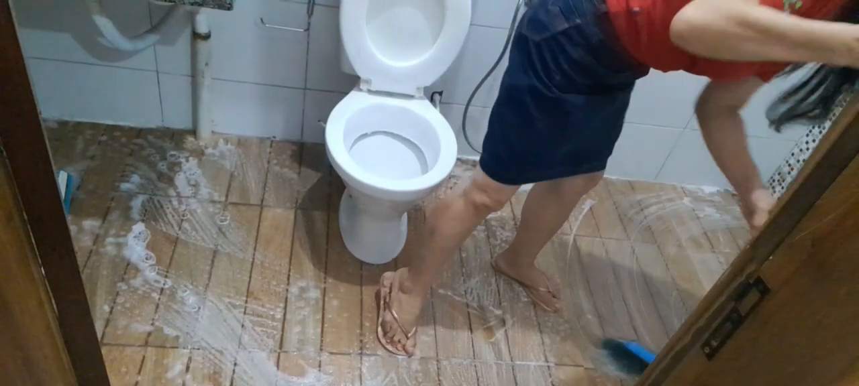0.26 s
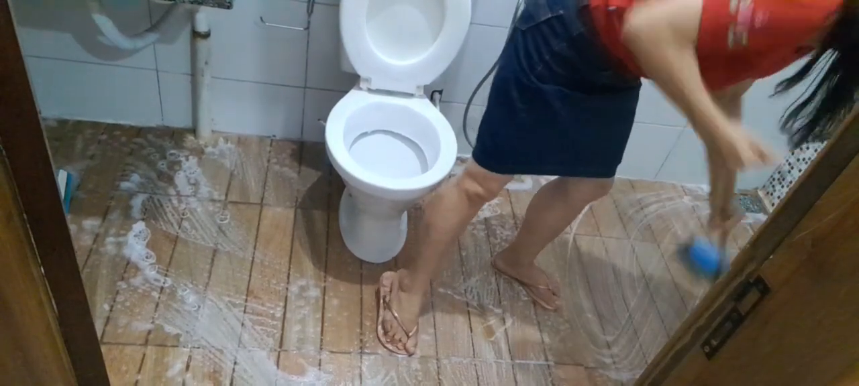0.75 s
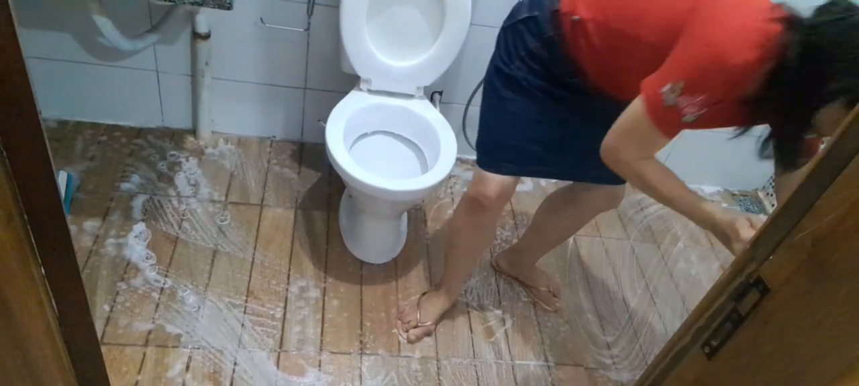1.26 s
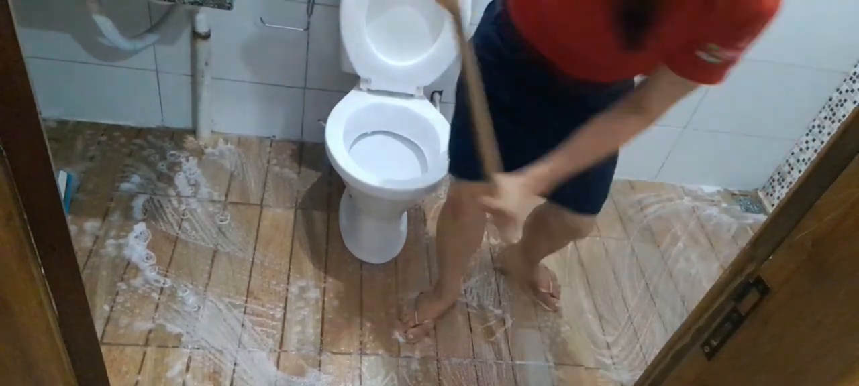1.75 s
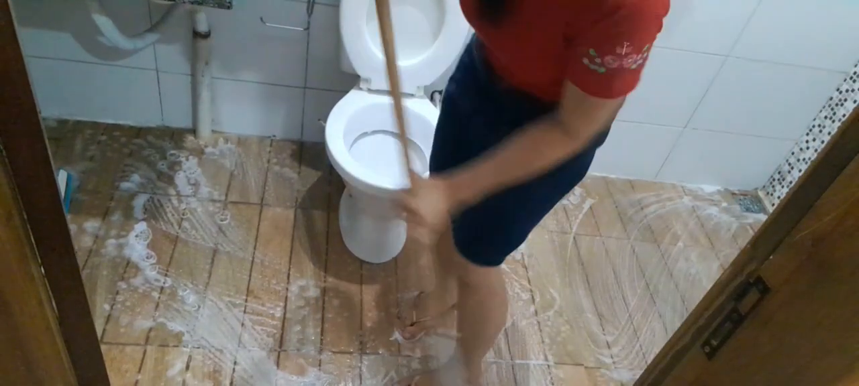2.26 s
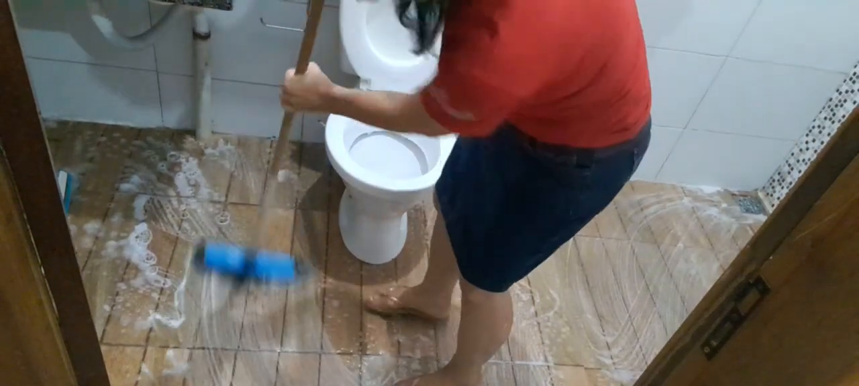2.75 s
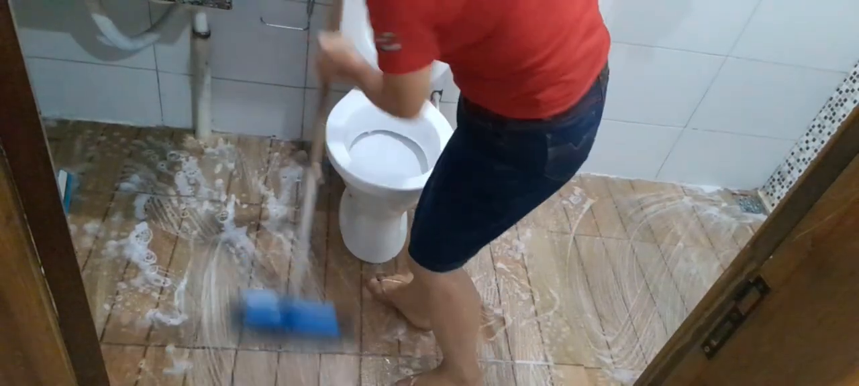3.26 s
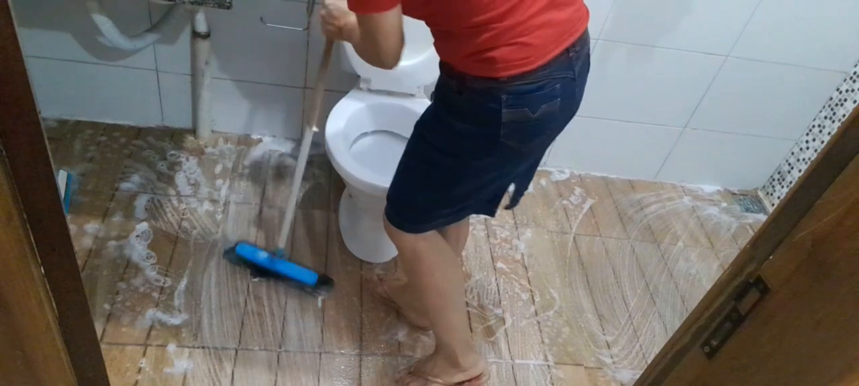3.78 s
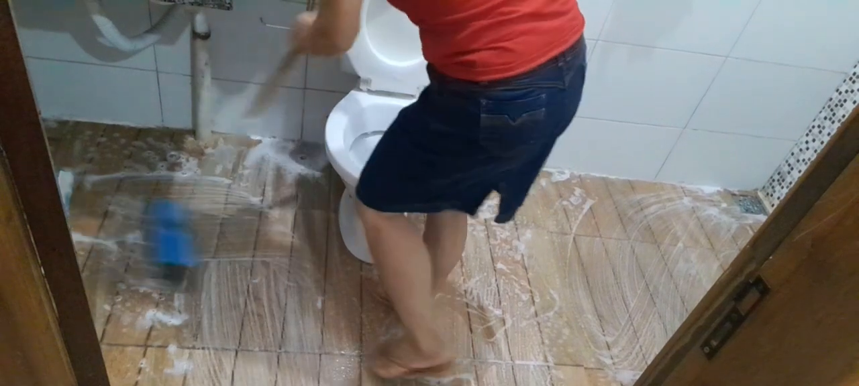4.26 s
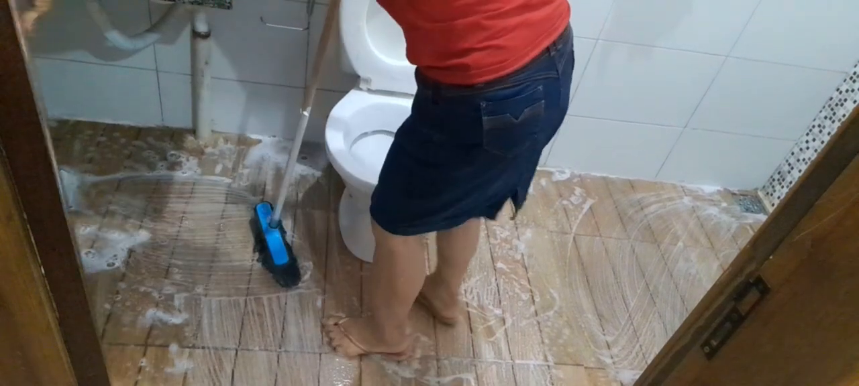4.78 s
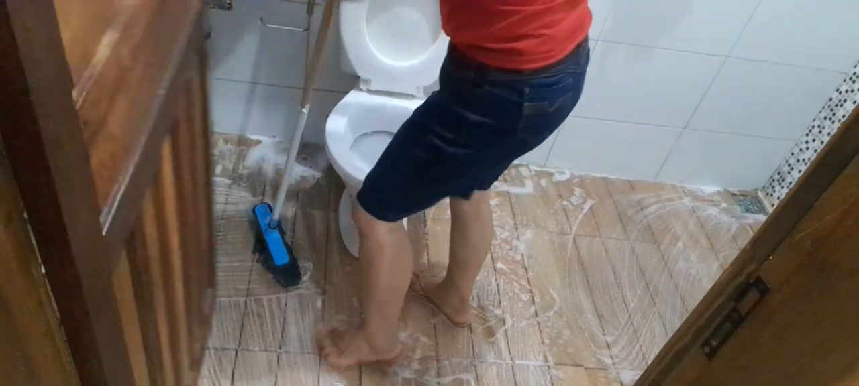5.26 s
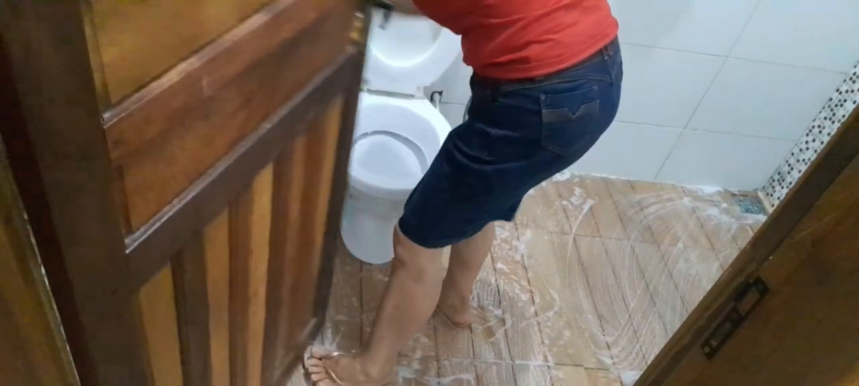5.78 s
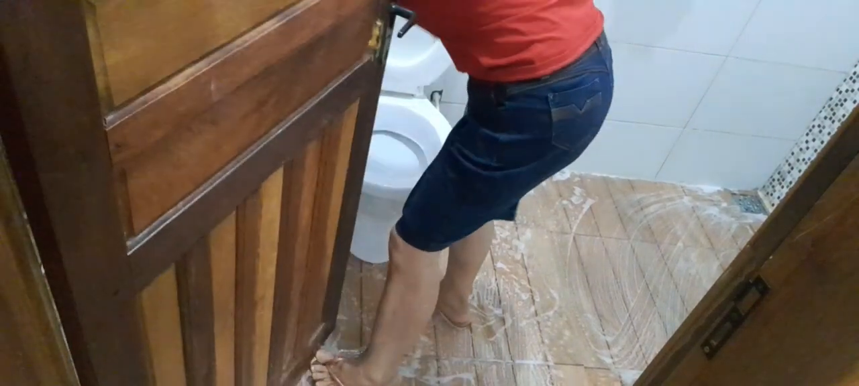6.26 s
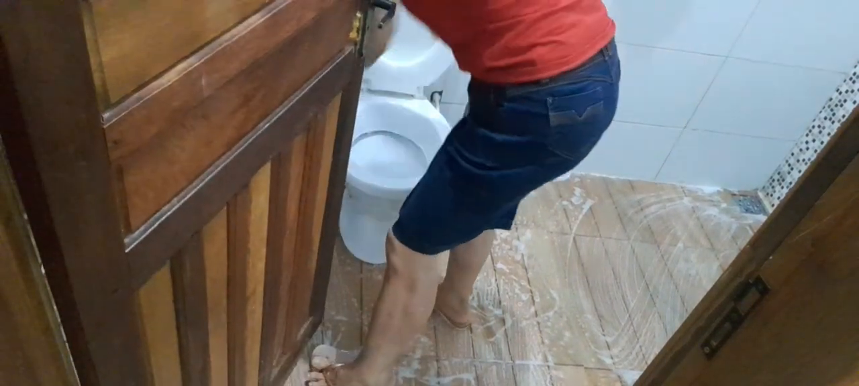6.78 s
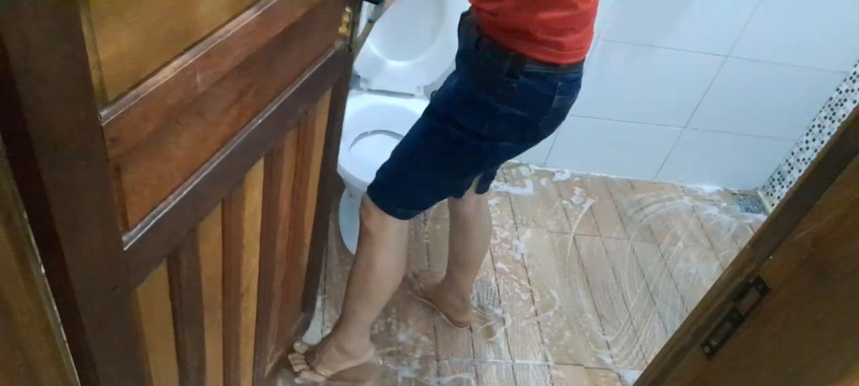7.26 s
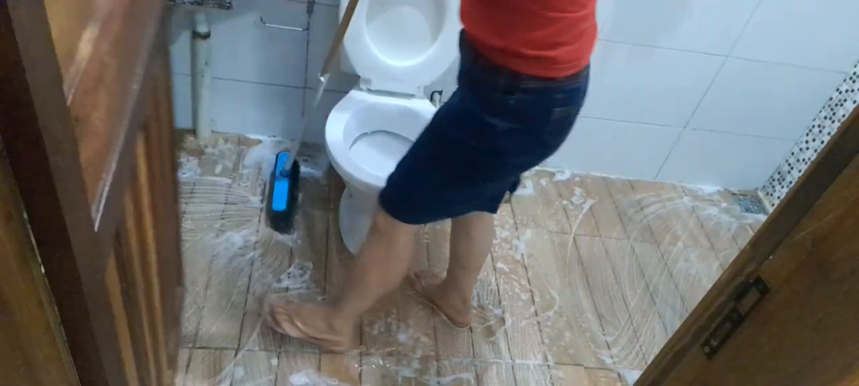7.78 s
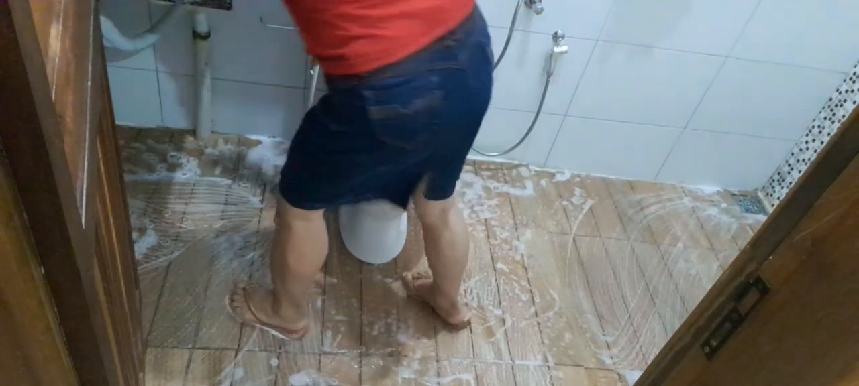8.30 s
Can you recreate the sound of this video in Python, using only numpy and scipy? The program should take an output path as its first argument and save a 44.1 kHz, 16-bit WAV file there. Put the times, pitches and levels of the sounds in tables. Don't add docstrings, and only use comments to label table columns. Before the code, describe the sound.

A knock opens brisk wet scrubbing: bright bristle hiss, gritty suds and a low rumble of the brush head, one stroke after another. A loud clonk rings off the bowl midway. After a brief pause with soft steps and tiny squeaks, another run of strokes follows, with a wall knock and dull door booms. Then only small sandal scuffs and ticks remain. Reverberant bathroom, phone in the doorway, a few steps away.

```python
import sys
import numpy as np
from scipy import signal
from scipy.fft import rfft, irfft, next_fast_len
from scipy.io import wavfile
from scipy.ndimage import uniform_filter1d

SR = 44100
rng = np.random.default_rng(int(sys.argv[2]) if len(sys.argv) > 2 else 0)


def master(y):
    cut = np.clip(np.atleast_2d(y).T, -1, 1)
    pcm = np.round(cut * 32767)
    wavfile.write(sys.argv[1], SR, pcm.astype(np.int16))


def how_loud(loudness_db):
    steps = np.asarray(loudness_db, float) / 20
    return 10 ** steps


N = 376613
TIME = np.arange(N) / SR
SLOW = np.arange(0, N, 32) / SR


# [f/Hz, level/dB]
TIP_TONE = [(5000, -12.5), (7000, -9.5), (8500, -4.5), (11000, 0.5), (13500, 1.5), (15700, -3),
            (16500, -13.5)]
# [f/Hz, level/dB]
RASP_TONE = [(1200, -17), (2200, -6), (3500, -4), (5500, -4), (7500, -9), (10000, -42)]
# [f/Hz, level/dB]
HEAD_TONE = [(60, -27), (130, -10.5), (220, -17), (400, -9), (650, -8), (1000, -5), (1700, -4),
             (2600, -10.5), (4000, -31.5)]
# [f/Hz, level/dB]
STIR_TONE = [(25, -20), (55, 6), (120, 2.5), (250, -12), (450, -10), (800, -32)]


def brush():
    suds = how_loud(-80) ** 2 + steps(159, column=4) ** 2
    dragging = drags()
    tip_power = strokes(over_db=0, per_press=0, rise_db=0, edge=0.51) + suds
    rasp_power = strokes(over_db=-2, per_press=0.4, rise_db=2, edge=0.6)
    rasp_power = rasp_power + dragging * how_loud(2 * -5) + suds * how_loud(2 * 1.5)
    head_power = strokes(over_db=-5, per_press=1.3, rise_db=4, edge=0.76) + dragging + suds
    rasp_db = power_db(rasp_power)
    grout_db = 1.5 * walk(50)
    tips = sweep(flicks(9000, 2.2), power_db(tip_power) + grout_db, TIP_TONE, t60=0.28, direct_db=-11.0)
    rasp = sweep(flicks(5000, 3.07), rasp_db + grout_db, RASP_TONE, t60=0.47, direct_db=-12.0)
    head = sweep(flicks(2500, 3.4), power_db(head_power) + grout_db, HEAD_TONE, t60=0.45, direct_db=-15.5)
    tread_gain = uniform_filter1d(how_loud(rasp_db - 28), SR // 10)
    tread = colour(rng.standard_normal(N), STIR_TONE) * tread_gain
    return tips + rasp + head + tread


# [start t/s, length t/s, bristle speed as tip level/dB, gain from start to end level/dB,
# pressure on the head level/dB]
BRUSH_STROKES = [(-.07, 0.12, -32, -11, -4.5), (0.043, 0.48, -42.5, -3.5, 2), (0.448, 0.24, -40, 7.5, -2.5),
                 (0.778, 0.35, -42.5, 2, -2.5), (1.073, 0.21, -41.5, 1.5, 4),
                 (1.293, 0.063, -33.5, 5.5, -2), (1.497, 0.38, -42.5, 7, -1.5), (1.88, .28, -38, -5, -4),
                 (2.201, .3, -40, -7, 1), (2.546, 0.43, -40, -6.5, -0.5), (2.981, .25, -41, -1, -0.5),
                 (3.257, 0.31, -38, -2, -3.5), (3.546, 0.1, -39, -4.5, 7.5), (3.689, .21, -43, -3.5, -5),
                 (3.936, 0.18, -42.5, -8, 0), (4.062, 0.22, -44.5, -2, 1), (4.315, 0.16, -40, 1, -4),
                 (5.572, 0.28, -46, 9, 1), (5.788, 0.18, -37.5, -2.5, -3.5),
                 (6.03, 0.28, -41.5, -1.5, -3.5), (6.318, 0.32, -40, -1.5, -1),
                 (6.637, 0.43, -43.5, 3, -3.5), (7.146, .2, -49.5, -6.5, 3)]


def strokes(over_db, per_press, rise_db, edge):
    attack_s, release_s, arch_db = 0.089, 0.13, 1.5
    power = 0
    for s, length, db, gain_db, press_db in BRUSH_STROKES:
        t = SLOW - s
        speed_up = np.clip(t / attack_s, 0, 1)
        slow_down = np.clip((length + release_s / 2 - t) / release_s, 0, 1)
        part = np.clip(t / length, 0, 1)
        lean_db = (gain_db + rise_db) * (part - .5) + arch_db * (np.sin(np.pi * part) - .5)
        level = how_loud(db + over_db + per_press * press_db + lean_db)
        power = power + ((speed_up * slow_down) ** edge * level) ** 2
    return power


# [start t/s, length t/s, level/dB]
HEAD_DRAGS = [(0.362, 0.37, -43), (0.91, 0.14, -43.5), (1.997, 0.12, -45.5), (2.32, 0.091, -43),
              (2.757, 0.17, -46), (3.053, 0.11, -47), (3.448, 0.1, -38), (3.783, 0.084, -42),
              (4.059, 0.12, -38), (5.655, 0.18, -43.5), (6.287, 0.13, -42.5)]


def drags():
    power = 0
    for s, length, db in HEAD_DRAGS:
        swell = np.sin(np.pi * np.clip((SLOW - s) / length, 0, 1))
        power = power + (how_loud(db) * swell) ** 2
    return power


# [start t/s, level/dB, swell t/s, early echoes level/dB]
HEAD_BLOWS = [
    (.008, -21.5, 0.0049, 2),
    (1.139, -29.5, 0.0037, 1),
    (1.353, -22.5, 0.0044, 0.5),
    (1.776, -39.5, 0.011, -1),
    (3.5945, -18, 0.0028, 1.5),
    (5.944, -33.5, 0.0043, 0),
    (6.541, -24.5, 0.005, 1),
    (7.240, -40.5, 0.0054, -3.5),
]
# [f/Hz, level/dB]
NEAR_TONES = [
    [(47, -58), (80, -26), (219, -15.5), (397, -4), (474, -9), (808, -4.5), (965, 0.5), (1930, -7.5),
     (2440, -16.5), (3160, -17.5), (9000, -40.5), (11700, -57), (19800, -120)],
    [(47, -67), (80, -23.5), (537, 3.5), (745, -3.5), (871, 0.5), (1110, -4), (1680, -18), (1900, -11),
     (2590, -23), (5000, -32), (6500, -61), (11000, -120)],
    [(47, -78), (80, -28), (299, -7.5), (340, -14), (413, 0), (597, -10), (741, -4), (1270, -5.5),
     (1450, -3), (2090, -2.5), (3750, -16), (14000, -36.5)],
    [(47, -51), (80, -14), (379, -0.5), (454, -4), (1170, -2.5), (1400, -6.5), (1760, -6), (2220, -15),
     (4000, -23), (5200, -41), (8800, -120)],
]
# [f/Hz, level/dB]
FAR_TONES = [
    [(47, -77.5), (80, -49), (215, -13), (339, -12.5), (438, -7), (650, -10), (776, -8), (1130, -18.5),
     (1650, -19), (1750, -20.5), (1970, -23), (9000, -46), (11700, -80.5), (19800, -120)],
    [(18, -29), (30, 0), (140, 4.5), (266, -4.5), (330, 0), (409, -12.5), (654, -2), (1000, -13),
     (1380, -6), (2310, -14.5), (5000, -41), (6500, -56), (11000, -120)],
    [(47, -54), (80, -33.5), (404, -9), (493, -15.5), (589, -7.5), (984, -6), (1150, -4), (1580, -9),
     (2170, -8.5), (2700, -13.5), (9000, -38), (11700, -63), (19800, -120)],
    [(18, -35), (30, -24), (54, -3), (228, -9), (291, -12), (365, -11), (457, -18.5), (778, -19),
     (844, -14), (1320, -35), (4000, -37), (5200, -60), (8800, -120)],
]
# [start t/s, level/dB, centre f/Hz, width/octaves, direct sound level/dB]
SMALL_TAPS = [(3.5945, -26, 800, 1.4, 8), (3.79, -46.5, 120, 2.3, -16), (.01, -53, 140, 0.8, -8),
              (2.633, -42.5, 750, 1.9, -8), (4.790, -52.5, 3400, 1.55, 2.5), (4.818, -54, 900, 2.3, -7),
              (4.836, -54, 120, 1.9, -4), (4.9, -60, 200, 2.3, 5), (5.039, -51.5, 400, 2.1, -16),
              (4.87, -58, 2500, 2.4, 11), (5.03, -62.5, 2190, 0.74, -4), (5.101, -53, 920, 0.25, 6),
              (5.126, -59.5, 870, 0.29, 8), (5.179, -57, 2600, 0.8, 1), (5.181, -56, 747, 1.5, 2),
              (5.491, -53, 1300, 2.5, -5), (5.678, -44.5, 880, 1.4, -23.5), (7.526, -52.5, 1172, 1.4, -16),
              (7.564, -58, 1200, 1.7, 1), (7.730, -52.5, 966, 1.66, -18), (7.76, -75, 4000, 0.5, 5),
              (8.113, -59, 2400, 1.4, -9.5), (8.138, -55.5, 1500, 1.3, -16), (8.205, -51.5, 2000, 1.8, -11),
              (8.207, -65, 7980, 1.5, -2), (8.245, -67, 2800, 1.1, -12), (5.102, -77, 3700, 0.4, 5),
              (2.666, -51, 700, 1.2, 1), (2.845, -48, 1300, 1.2, -2), (3.086, -48, 1300, 1.3, -6),
              (3.146, -56, 1500, 1.2, 1), (3.865, -38.5, 970, 1.14, -10), (7.246, -54, 950, 0.73, -3),
              (1.213, -42, 900, 1, -8)]


def knocks():
    out = np.zeros((2, N))
    for (s, db, swell_s, early_db), tone in zip(HEAD_BLOWS, NEAR_TONES + FAR_TONES):
        blow = colour(room(swell_s, -21.5, early_db), tone)
        add(out, how_loud(db + 39.0) * blow, s)
    for s, db, hz, octaves, direct_db in SMALL_TAPS:
        edge = 2 ** (max(octaves, .1) / 2)
        hump = [(hz / edge ** 3, -30), (hz / edge, -5), (hz, 0), (hz * edge, -5), (hz * edge ** 4, -45)]
        tap = colour(room(0.0025, direct_db, size=2 ** 14), hump, size=1024)
        add(out, how_loud(db + 34.0) * tap, s)
    return out


# [start t/s, free ringing t/s, level/dB, modes [f/Hz, level/dB, fall by 60 dB t/s]]
BLOW_RINGS = [(3.595, .5, -18.5, [(231, -7.5, 0.5), (435, -13, 0.64), (458, -10, .4), (544, -8, 0.8),
              (712, -11, 0.72), (760, 2, .4), (789, 3.5, .42), (820, -4.5, 0.16), (1206, -12, .25),
              (1346, -19, .8), (1475, -15, .4), (1663, -15, .5), (1997, -19, .4)]),
              (3.81, .1, -38, [(179.3, -5.5, 0.82), (228, -5, 0.54), (366, -9, .6), (481, -1.5, 0.94),
              (544, -7, 0.78), (787, 1.5, 2.5), (822, 3, 0.73), (1180, -14, 1.0), (1394, -14, 1.0),
              (1965, -15, .6)]), (3.935, .1, -48, [(544, 0, .9), (500, -5, .6), (786, -1, .9)]),
              (5.69, .12, -51, [(867, 2.5, 1.5), (900, -3, 1.2), (1295, 3, .6), (342, -3.5, 0.87)]),
              (1.356, 0.17, -33.5, [(412.7, -0.5, .7), (450, 0, .6), (489, -1, .5), (1450, -2, .35)]),
              (5.898, .05, -43.5, [(54, -4, .4), (118, 0, .3)]), (5.946, .16, -39, [(54, 1, .7),
              (80, -3, .4), (118.4, 1.5, 0.45)]), (6.14, .12, -48, [(53.7, 2, .5)]),
              (7.22, .035, -34.5, [(107, 2.5, 0.23), (212, -5, .2)]), (7.24, .17, -37.5, [(54, 1, 1),
              (118, -5.5, 0.87), (226, -4, 0.36), (383, -16, .8), (484, -16, 1)]),
              (7.248, .17, -49.5, [(849, 2, 1.0), (917, 1, 0.46), (718, -9, .6)])]
# [start t/s, length t/s, f/Hz, level/dB]
SQUEAKS = [(4.62, .16, 2230, -70), (4.9, .155, 950, -58.5), (5.06, .2, 880, -66),
           (3.48, .1, 740, -52), (5.19, .05, 2300, -65), (4.88, .14, 1830, -69),
           (5.1, .08, 1800, -66)]


def rings():
    shake = SR // 30
    out, t = np.zeros(N), TIME[:21 * shake]
    for s, free_s, ring_db, modes in BLOW_RINGS:
        damping = how_loud(-110 * np.maximum(t - free_s, 0))
        shape = (1 - np.exp(-t / 0.0015)) * damping
        for hz, db, t60 in modes:
            rattle = np.interp(t, t[::shake], rng.standard_normal(21))
            fade = np.exp(-np.log(1000) * t / t60)
            tone = np.sin(2 * np.pi * hz * t + .6 * rattle)
            add(out, how_loud(ring_db + db + 3.8 * rattle) * shape * fade * tone, s)
    for s, length, hz, db in SQUEAKS:
        count = int(length * SR)
        waver = 1 + 0.0036 * walk(25.5)[:count]
        tone = np.sin(2 * np.pi * np.cumsum(hz * waver) / SR)
        add(out, how_loud(db) * np.hanning(count) ** 0.36 * tone, s)
    return out


# [f/Hz, level/dB]
SCUFF_TONE = [(180, -40), (300, 4.5), (477, 0.5), (749, 0.5), (927, -1.5), (1610, -6.5), (2090, -5.5),
              (6000, -23.5), (7800, -42), (13200, -120)]


def shuffle():
    scuff = colour(flicks(900, 3.8), SCUFF_TONE)
    stir = colour(flicks(300, 2.6), STIR_TONE)
    scuff_gain = np.interp(TIME, SLOW, steps(210, column=2))
    stir_gain = np.interp(TIME, SLOW, steps(143, column=3))
    return scuff * scuff_gain + stir * stir_gain


# [start t/s, hold t/s, scuff level/dB, low stir level/dB, suds splash level/dB]
SANDAL_STEPS = [(4.548, 0.073, -58, -86, -67.5), (4.65, 0.036, -72, -92, -65.5),
                (4.772, 0.073, -48, -53, -65.5), (4.926, 0.042, -73, -61, -90),
                (5.076, .15, -55, -58.5, -74), (5.4, 0.052, -81.5, -85.5, -71),
                (5.481, 0.011, -52.5, -79, -60), (5.564, 0.11, -69, -78, -60), (7.356, 0.19, -58, -52, -68),
                (7.535, 0.037, -68, -61, -81), (7.726, 0.021, -53.5, -69, -69),
                (7.852, 0.37, -85.5, -93, -80), (8.02, 0.085, -85, -92, -73.5),
                (8.121, 0.022, -52.5, -87, -80), (8.184, 0.054, -59, -60, -71),
                (8.397, .2, -62.5, -85, -72)]


def steps(fall_db_s, column):
    gain = 0
    for row in SANDAL_STEPS:
        t = SLOW - row[0]
        rise = np.clip(t / 0.012, 0, 1)
        gain = gain + rise * how_loud(row[column] - fall_db_s * np.maximum(t - row[1], 0))
    return gain


# [f/Hz, level/dB]
AIR_TONE = [(15, -54.5), (25, -2.5), (80, 5.5), (309, -3.5), (516, -10.5), (734, -5.5), (936, -10),
            (1940, -21.5), (8360, -29.5), (12900, -24.5), (16000, -27.5)]


def hush():
    return how_loud(-68 + 1.5 + 0.72 * walk(1.89)) * air(AIR_TONE)


# [f/Hz, fall by 60 dB t/s]
ECHO_TIMES = [(60, 0.73), (250, 0.66), (700, 0.65), (1500, 0.59), (3500, 0.68), (7000, 0.49), (14000, 0.83)]
# [f/Hz, level/dB]
EAR_DIFFERENCE = [(60, -11), (150, -13), (300, -13), (600, -6.5), (1200, -1.5), (2500, 0)]


def room(swell_s, direct_db, early_db=0, size=2 ** 15):
    t, hz = TIME[:size], np.arange(size // 2 + 1) * SR / size
    mid, side, near = rfft(rng.standard_normal((3, size)))
    side = side * how_loud(along(EAR_DIFFERENCE, hz))
    ears = np.array([mid + side, mid - side])
    early = how_loud(early_db * np.exp(-(t / .05) ** 4))
    onset = (1 - np.exp(-t / max(swell_s, 1e-4))) * early
    out = how_loud(direct_db) * irfft(near) * np.exp(-t / 0.001) / 4
    for centre in 50 * 3. ** np.arange(6):
        distance = np.abs(np.log(np.clip(hz, 50, 12150) / centre) / np.log(3))
        share = np.maximum(1 - distance, 0)
        fade = onset * np.exp(-np.log(1000) * t / along(ECHO_TIMES, centre))
        out = out + irfft(ears * share) * fade / np.sqrt(np.sum(fade ** 2))
    return out / np.sqrt(np.mean(np.sum(out ** 2, axis=1)))


def roam(x, step_s, direct_db, count=6):
    moves, size = np.arange(0, TIME[-1] + step_s, step_s), next_fast_len(N + SR)
    place, out = rng.integers(0, count, N // 100)[:len(moves)], 0
    for k in range(count):
        here = np.sqrt(np.interp(TIME, moves, 1. * (place == k)))
        out = out + rfft(x * here, size) * rfft(room(0.0022, direct_db), size)
    return irfft(out, size)[:, :N]


def sweep(grains, db, table, t60, direct_db):
    grains = grains * how_loud(db)
    keep = np.exp(-np.log(1e6) / (max(t60, .02) * SR))
    linger = np.sqrt(signal.lfilter([1 - keep], [1, -keep], grains ** 2))
    near = colour(grains, table) * how_loud(direct_db)
    return linger * air(table) + np.array([np.roll(near, 4), near])


def air(table):
    mid, side = colour(rng.standard_normal((2, N)), table)
    side = colour(side, EAR_DIFFERENCE)
    return np.array([mid + side, mid - side]) / np.sqrt(2)


def flicks(rate, scatter_db):
    when, sign, push = rng.random((N, 3)).T
    force = np.minimum(-np.log(1 - push), 3)
    x = (when < rate / SR) * np.sign(sign - .5) * how_loud(scatter_db * force)
    return x / np.std(x)


def walk(rate):
    k = int(SR / rate)
    held = np.repeat(rng.standard_normal(N // k + 1), k)
    return 1.46 * uniform_filter1d(held, k)[:N]


def along(table, hz):
    table = np.array(table, float)
    return np.interp(np.log(np.maximum(hz, 1)), np.log(table[:, 0]), table[:, 1])


def colour(x, table, size=4096):
    hz = np.arange(size // 2 + 1) * SR / size
    cep = irfft(np.log(how_loud(along(table, hz))))
    cep[1:size // 2] *= 2
    cep[size // 2 + 1:] = 0
    h = irfft(np.exp(rfft(cep)))
    h = h / np.sqrt(np.sum(h ** 2))
    whole = next_fast_len(x.shape[-1] + size)
    return irfft(rfft(x, whole) * rfft(h, whole), whole)[..., :x.shape[-1]]


def power_db(power):
    return np.interp(TIME, SLOW, 10 * np.log10(power))


def add(out, x, s):
    i = int(s * SR)
    out[..., i:i + x.shape[-1]] += x[..., :N - i]


def scene():
    tones = rings()
    moving = brush() + roam(shuffle() + 0.56 * tones, .05, -19.5, count=2)
    balance = how_loud(np.array([[-.4], [.4]]))
    return (moving + knocks() + tones + hush()) * balance


def band_limit(x):
    return signal.sosfilt(signal.butter(12, 16630, fs=SR, output="sos"), x)


def record(dry):
    no_bass = signal.butter(3, 42, "high", fs=SR, output="sos")
    no_top = signal.ellip(12, .3, 90, 15730, fs=SR, output="sos")
    dry = signal.sosfilt(no_bass, dry)
    rounded = np.tanh(0.64 * dry) / 0.57
    mix = signal.sosfilt(no_top, rounded)
    return band_limit(mix)


dry = scene()
out = record(dry)
master(out)
```